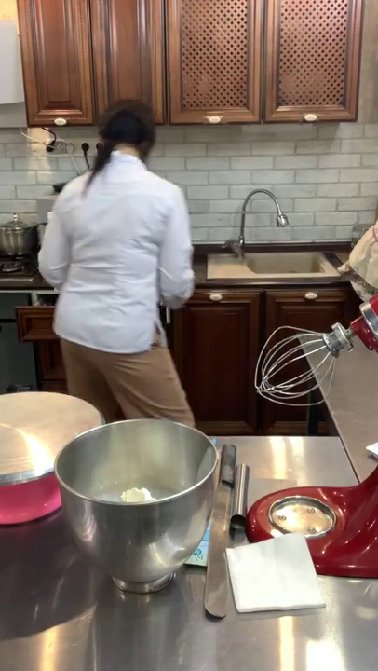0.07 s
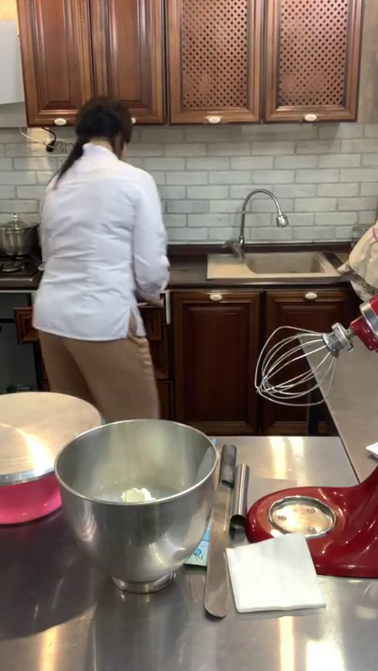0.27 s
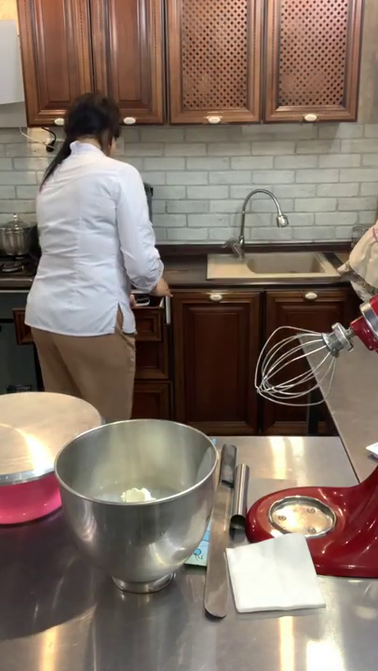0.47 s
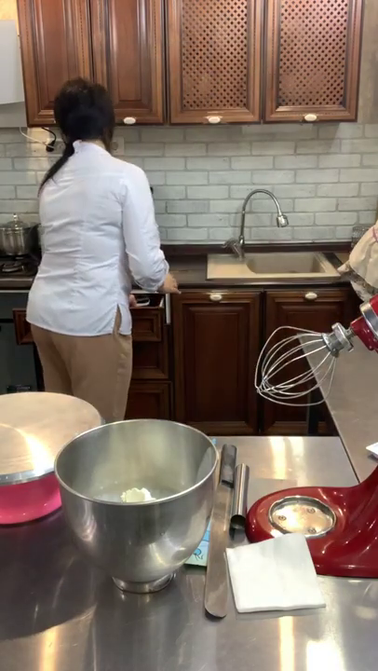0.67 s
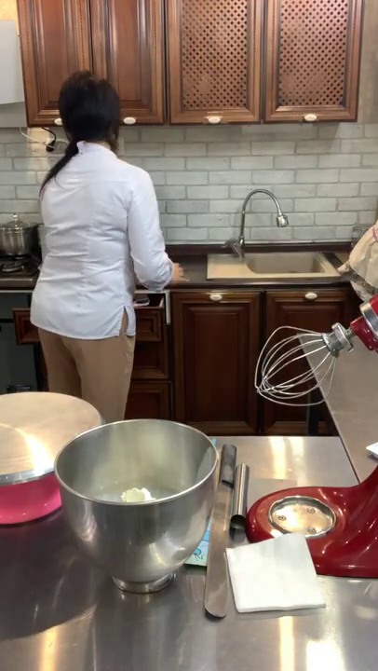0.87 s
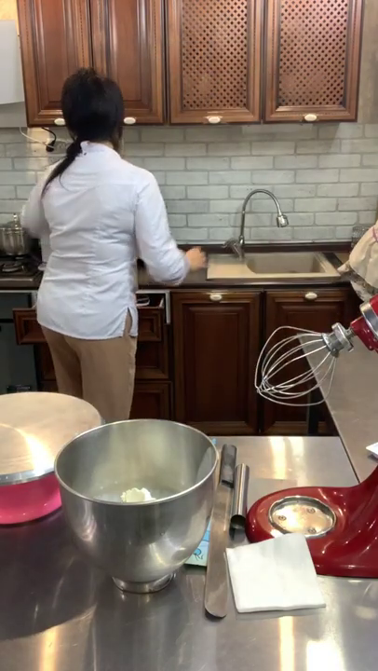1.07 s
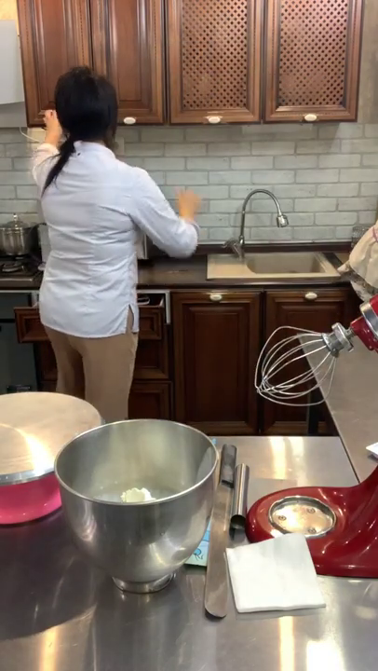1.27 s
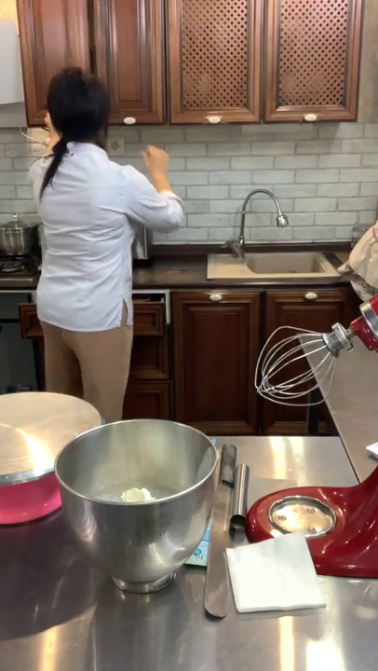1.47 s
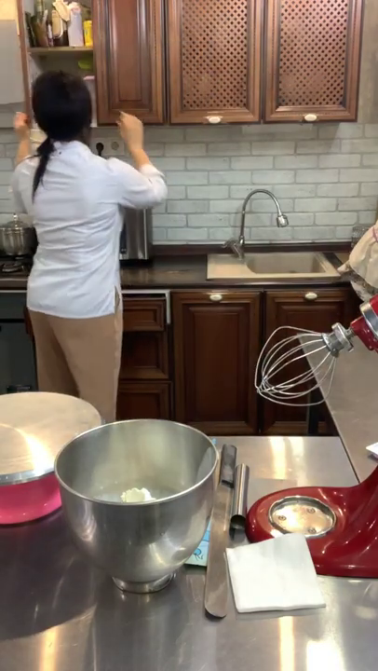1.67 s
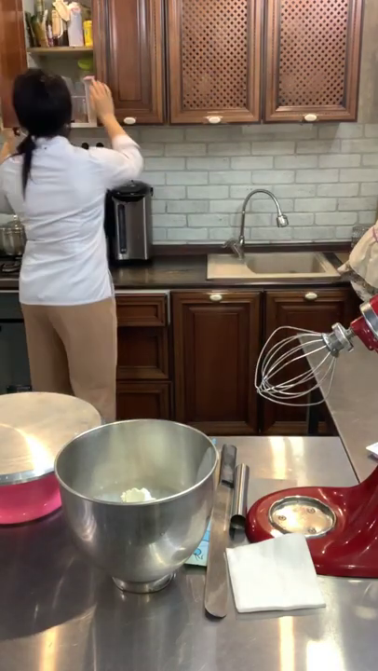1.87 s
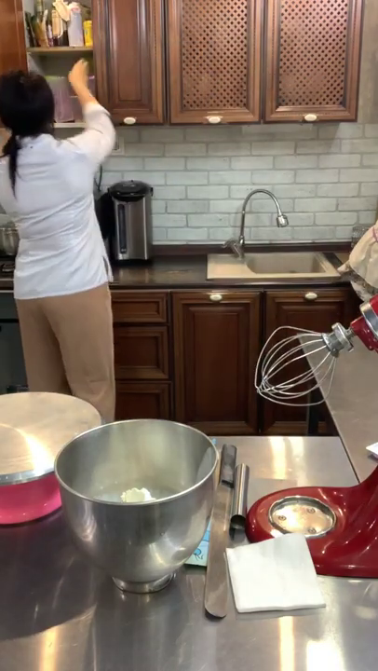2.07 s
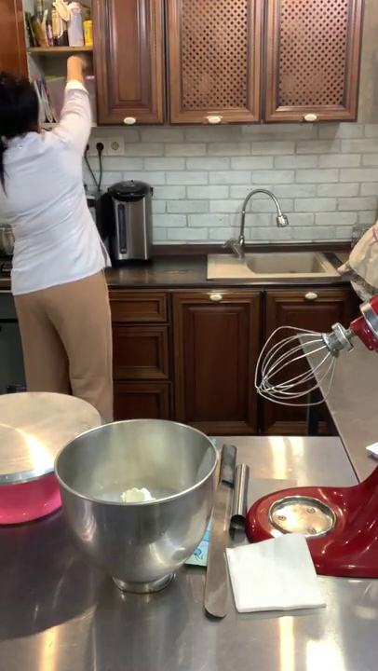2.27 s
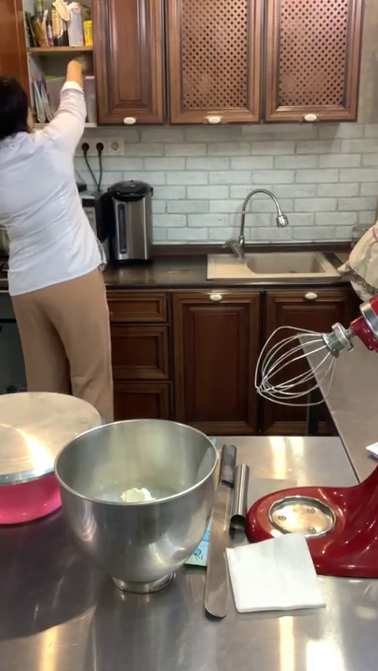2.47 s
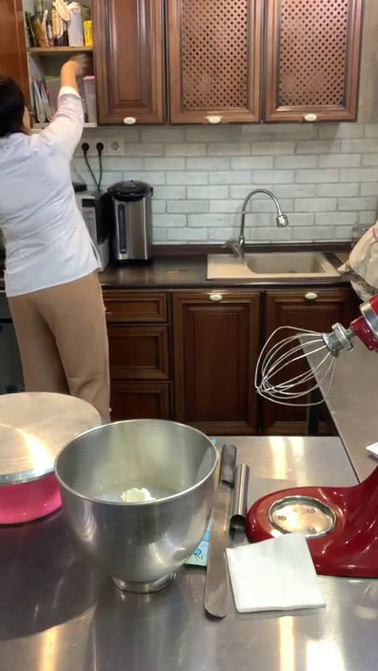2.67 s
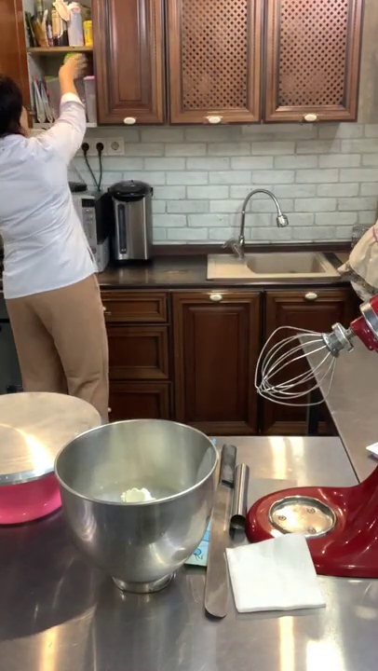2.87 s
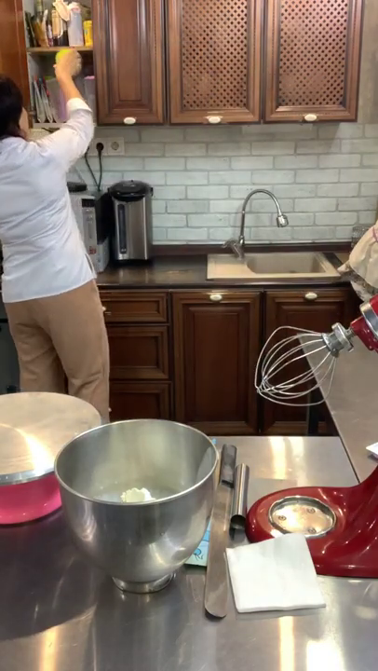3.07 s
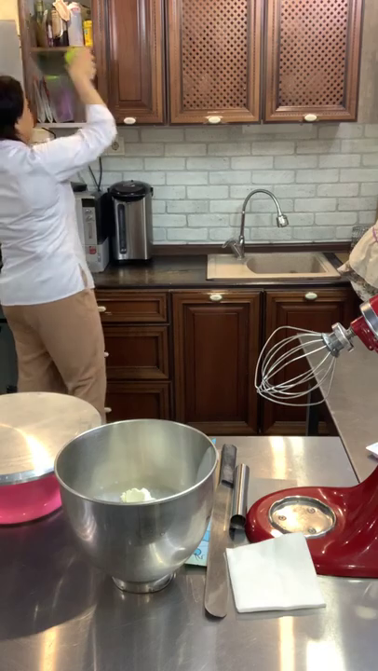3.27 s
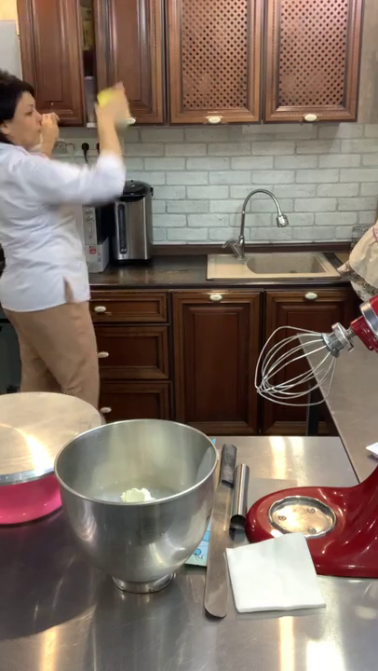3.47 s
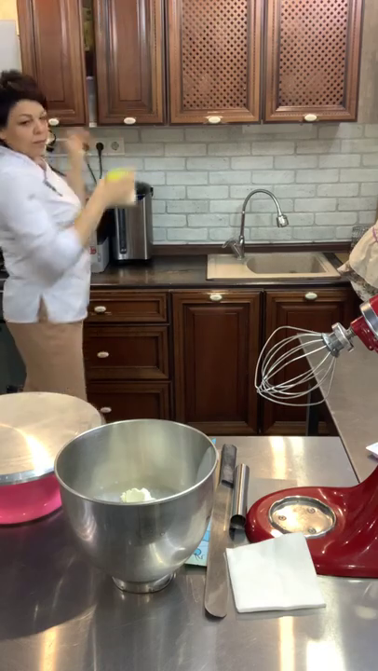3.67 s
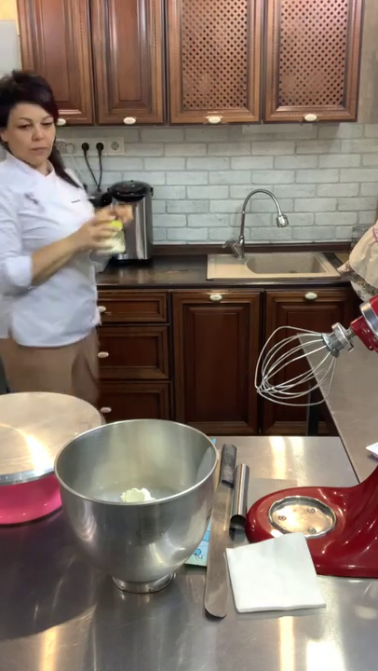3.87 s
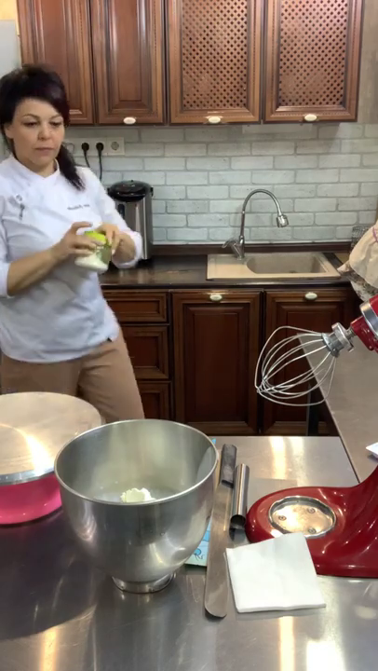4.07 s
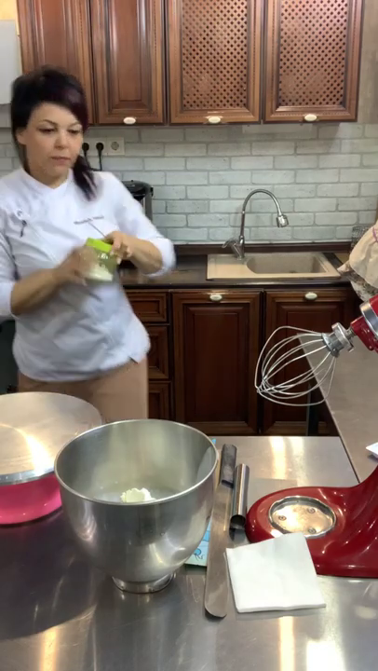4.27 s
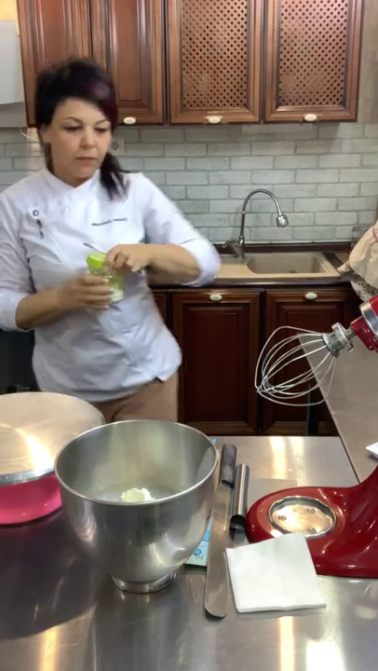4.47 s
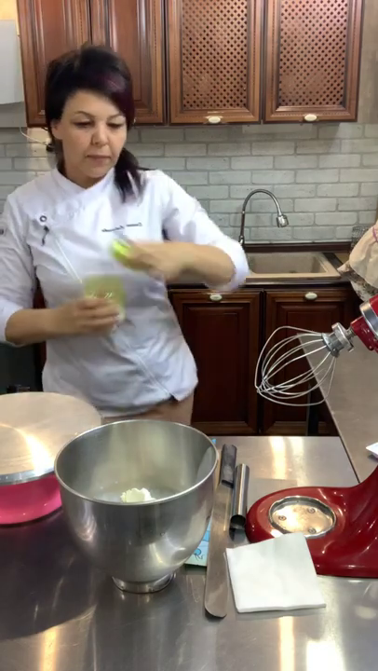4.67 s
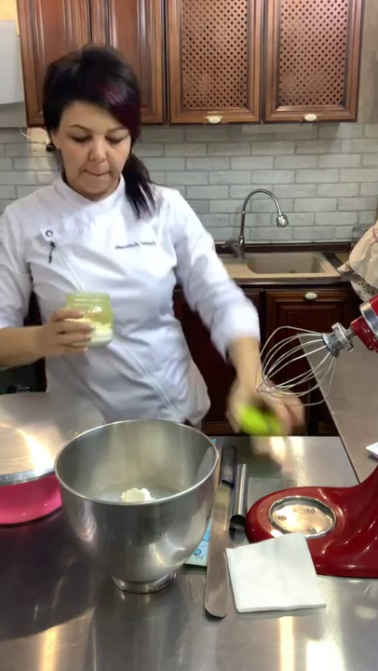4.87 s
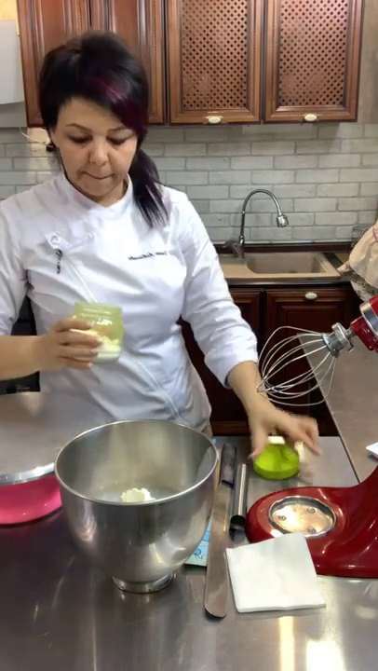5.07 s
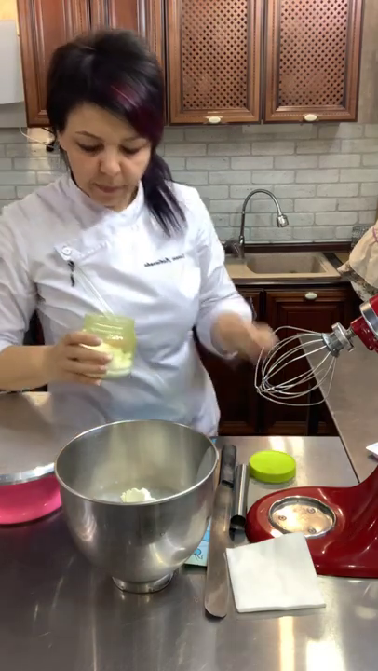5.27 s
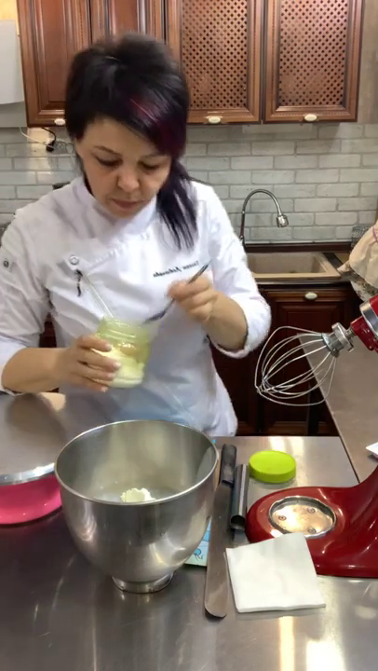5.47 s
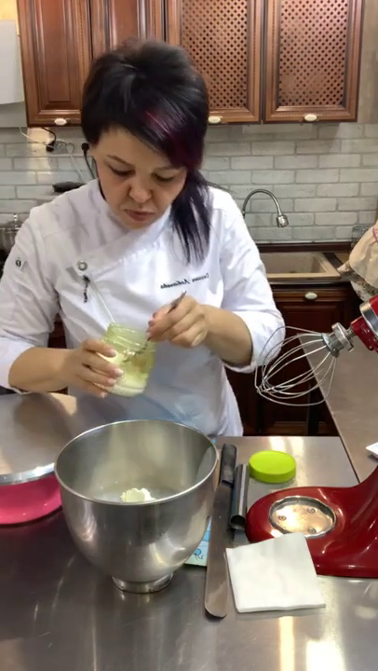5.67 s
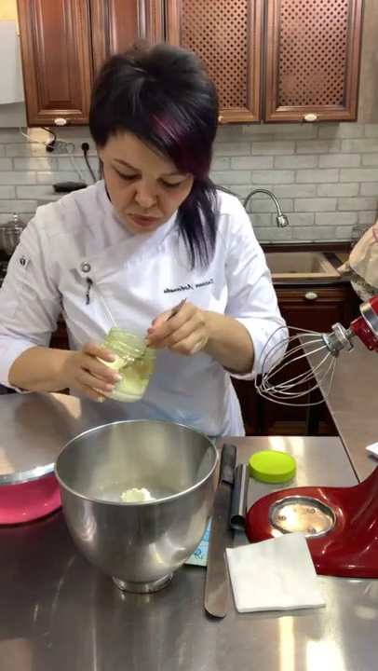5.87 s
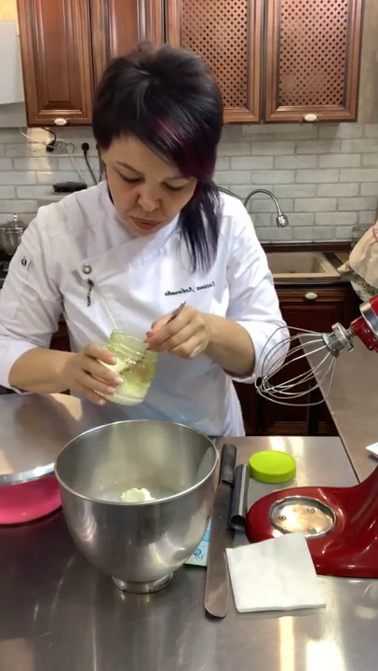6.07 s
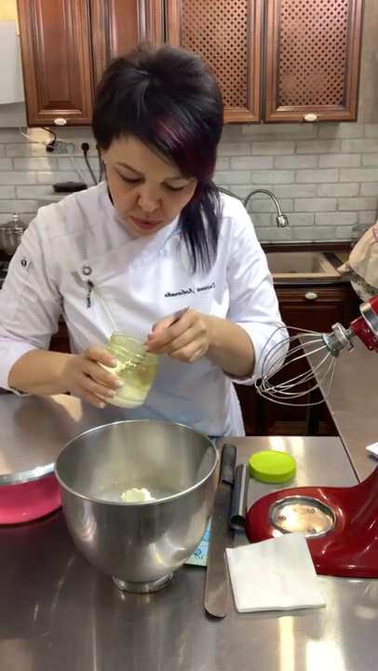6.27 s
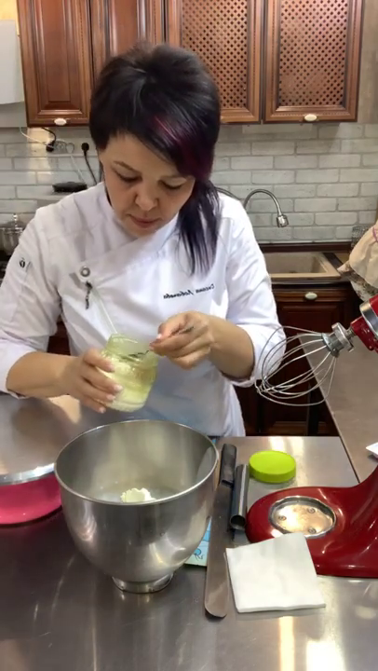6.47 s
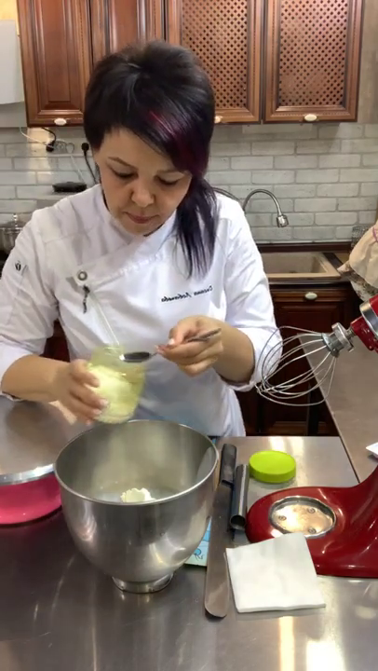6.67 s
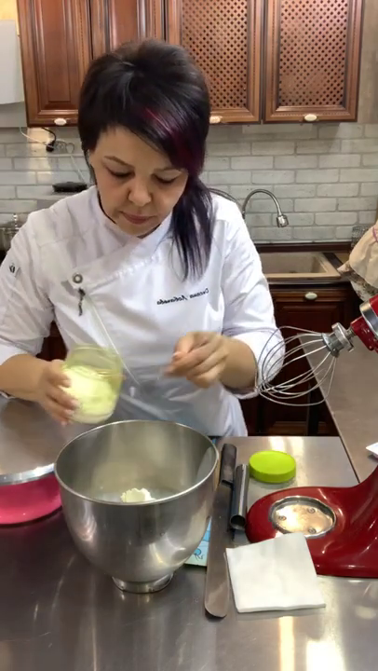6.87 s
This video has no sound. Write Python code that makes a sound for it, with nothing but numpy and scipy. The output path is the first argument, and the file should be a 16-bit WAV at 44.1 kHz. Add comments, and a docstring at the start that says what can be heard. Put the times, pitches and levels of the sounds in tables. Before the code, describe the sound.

Indoor kitchen with a quiet fridge and fan hum, microphone on the worktop. At the far wall come light wooden knocks, gritty drawer scrapes and clinking cutlery, then a heavy drawer thump. After a faint jar scrape, a cupboard door bangs in a tight cluster of cracks with low boom and short room tail. Nearer, soft hand rubbing, a sharp click, hollow plastic taps settling in pairs, and a tiny metallic ping.

```python
"""Kitchen drawer, cupboard and jar lid

A fridge hums in a tiled kitchen. A cutlery drawer is pulled in short strokes and bumped shut; a jar is taken
from a wall cupboard, whose wooden door slams. Close by, its plastic lid is unscrewed and dropped on a steel
worktop, and a spoon pings. Struck parts are damped sines and filtered noise bursts, friction is gritty
filtered noise, the fridge and fan are shaped noise with steady tones; synthetic room tails set the distance.
"""
import sys
import numpy as np
from scipy import signal
from scipy.fft import rfft, irfft, next_fast_len
from scipy.io import wavfile
from scipy.ndimage import uniform_filter1d

SR = 44100
rng = np.random.default_rng(int(sys.argv[2]) if len(sys.argv) > 2 else 0)


def wrap_up_sound(samples):
    """Save the sound to the file named by the first command line argument, as 16-bit audio."""
    columns = np.atleast_2d(samples).T
    # keep every value between -1 and 1, then stretch to whole-number steps
    tamed = np.clip(columns, -1, 1)
    steps = np.round(tamed * 32767).astype(np.int16)
    wavfile.write(sys.argv[1], SR, steps)


N = 305260  # length of the scene in samples
T = np.arange(SR) / SR  # one second of time, the longest any single sound lasts before the room
EDGE_HZ = 16000  # upper band limit

# Colour tables give relative shape only. Event levels are set before any room.
# Air noise colour: (frequency [Hz], level [dB])
AIR_COLOUR = [(15, -29), (24, -29), (32, -0.5), (60, 2), (95, -3), (115, -4), (300, -11.5), (500, -15.5),
              (900, -19.5), (1900, -27.5), (2900, -25), (4500, -33), (8500, -36), (11500, -51.5),
              (15500, -44)]
AIR_DB = -53.5  # rms
# Broad hums and whine of a fan: (frequency [Hz], level [dB], width [Hz])
FAN_HUMS = [(59.7, -63, 11), (320.5, -66.5, 18), (2995, -73.5, 20)]
COMPRESSOR_HZ = 49.27
# Strong orders of the fridge compressor: (multiple of its pitch [count], level [dB])
COMPRESSOR_ORDERS = [(2, -67.5), (3, -67.5), (4, -65), (11, -72), (12, -69.5), (13, -72), (14, -83),
                     (21, -80), (45, -80.5), (57, -73.5), (58, -78), (60, -77), (61, -72), (80, -80),
                     (81, -83)]
# Light knocks and clicks of drawer, doors and shelf:
# (time [s], level [dB], centre [Hz], width [octaves])
KNOCKS = [(0.0, -46.5, 480, 0.99), (.368, -45, 1550, 0.71), (.458, -39, 720, 1.86), (.497, -47.5, 330, 0.8),
          (.63, -40.5, 870, 0.91), (1.29, -49, 1090, 1.37), (1.365, -51, 570, 1.4),
          (1.549, -44.5, 330, 0.92), (1.582, -45, 288, 1.8), (1.937, -59.5, 2480, 1.15),
          (2.557, -47.5, 1610, 0.72), (3.012, -58.5, 400, 1.4), (3.567, -57.5, 7100, 1.4),
          (4.099, -50, 8100, 0.28), (4.381, -55, 2450, .3), (4.445, -48.5, 374, 0.52)]
# Rattle at 1 kHz; smaller parts settle sooner, by this power of their pitch
KNOCK_T60_S, KNOCK_SHORTENING = 0.069, 0.34
# Pushes on drawer and door: (start [s], length [s], level [dB])
PUSHES = [(0.0, 0.077, -47.5), (1.298, .29, -42), (1.765, 0.12, -41), (1.985, .13, -46)]
# Carcass rumble colour: (frequency [Hz], level [dB])
CARCASS_COLOUR = [(40, -25), (65, -6), (82, 0), (105, -3), (135, -13), (220, -14), (400, -32), (2000, -90)]
# Colour of the rollers' murmur under a push: (frequency [Hz], level [dB])
ROLLERS_COLOUR = [(100, -25), (240, 3.5), (420, -3.5), (700, -7.5), (1500, -18.5), (2600, -20.5),
                  (9000, -29.5), (12000, -53)]
ROLLERS_DB = -9  # relative to the rumble
# Pulls that scrape the drawer along its runners: (start [s], length [s], level [dB])
DRAWER_PULLS = [(.115, 0.36, -52.5), (.448, 0.11, -41.5), (.685, 0.072, -39)]
# Runner scrape colour: (frequency [Hz], level [dB])
RUNNERS_COLOUR = [(150, -27), (250, 4), (400, -3), (860, -0.5), (1500, -6), (2320, -4.5), (4000, -8.5),
                  (5300, -7), (9000, -9), (11500, -26), (16000, -24)]
# Runner squeaks, level of the fundamental: (start [s], length [s], level [dB])
SQUEAKS = [(0.275, 0.023, -51), (0.361, .025, -50)]
# Pitch at the first squeak; it climbs as the drawer gathers speed
SQUEAK_HZ, SQUEAK_RISE_HZ_PER_S = 1147, 1480
# Cutlery jostling in the drawer:
# (time [s], level [dB], pitch scale of the modes [factor], ring relative to jangle [dB])
CLINKS = [(.461, -44.5, 0.83, -8), (.556, -46.5, 0.63, -14), (0.69, -46.5, 1.3, -19),
          (1.577, -44, 0.99, 12)]
# Ringing modes of the cutlery: (frequency [Hz], level [dB], T60 [s])
CUTLERY_MODES = [(1550, -9, 0.28), (3140, 2.5, 0.067), (3480, 3, 0.04), (4570, -3, 0.11), (4700, 2, 0.085),
                 (5230, 3, 0.058), (6100, -4, 0.077), (6470, -2, 0.059), (7960, -2, 0.098), (8280, 1, 0.08),
                 (9470, -17, .15), (14400, -19, 0.12)]
# Colour of metal jangling: (frequency [Hz], level [dB])
JANGLE_COLOUR = [(1500, -14), (3000, -2), (5200, 5), (9000, 0.5), (11500, -16.5), (15500, -15)]
# One fork tine is plucked: (time [s], level [dB])
TINE_PING = (.691, -50)
# Ringing modes of the tine: (frequency [Hz], level [dB], T60 [s])
TINE_MODES = [(5300, -2, .15), (8930, -5, .15), (10320, -9, .25), (14450, -15, .3), (14930, 0, .07),
              (15120, -1, .06)]
# Blows of the drawer on its stop:
# (time [s], crack level [dB], brightness [dB/octave], nominal rattle T60 [s], boom level [dB])
DRAWER_BLOWS = [(2.104, -51.5, 3, 0.15, -42), (2.133, -30, -1, 0.095, -40), (2.143, -21.5, 1, 0.064, -19.5),
                (2.176, -33, 0.5, 0.15, -24), (2.222, -34, 2, 0.078, -28.5)]
# Colour of the drawer's wooden crack: (frequency [Hz], level [dB])
DRAWER_WOOD = [(50, -23), (105, -4.5), (140, -4.5), (175, -12), (320, -15), (470, -14), (700, -16),
               (800, -19), (1300, -19.5), (1800, -23), (2840, -28), (8000, -39), (11000, -51.5),
               (16000, -66)]
# Booming modes of drawer and cabinet: (frequency [Hz], level [dB], T60 [s])
DRAWER_MODES = [(69.1, -1.5, 0.91), (79.5, -3, 0.8), (127.4, 3, 0.41), (137.8, -1.5, 0.9),
                (356, -10.5, 0.38), (426, -2, 0.14), (477, 2.5, 0.12), (559, -4, 0.27), (711, -5, 0.3),
                (917, -16, .25), (1045, -24, .3), (1343, -12, 0.27)]
# The jar is dragged over the shelf: (start [s], length [s], level [dB])
JAR_DRAGS = [(2.705, .125, -53), (2.86, 0.15, -58.5)]
# Jar scrape colour: (frequency [Hz], level [dB])
JAR_COLOUR = [(600, -8), (1300, 2.5), (2500, -1), (3600, -11.5), (9000, -31), (14000, -49)]
# Colour of the shelf board droning under the jar: (frequency [Hz], level [dB])
SHELF_COLOUR = [(90, -23), (170, -1), (240, -2), (400, -13), (900, -32), (3000, -70)]
SHELF_DB = 1.5  # relative to the scrape
# Blows of the cupboard door on its frame:
# (time [s], crack level [dB], brightness [dB/octave], nominal rattle T60 [s], boom level [dB])
DOOR_BLOWS = [(3.915, -38, 5, .03, -43), (3.9185, -20, -1.5, 0.062, -16), (3.931, -20, 0.9, 0.047, -42),
              (3.958, -29.5, 0.5, 0.12, -40), (4.044, -27.5, -1.5, 0.072, -25),
              (4.098, -39, 2.5, 0.069, -31)]
# Colour of the door's wooden crack: (frequency [Hz], level [dB])
DOOR_WOOD = [(40, -27.5), (70, -10.5), (145, -5), (178, -16), (256, -7), (350, -19), (480, -19),
             (800, -16.5), (1050, -16.5), (1440, -20.5), (2000, -22.5), (3200, -24), (8300, -38.5),
             (11000, -57), (16000, -67)]
# Booming modes of door and cupboard: (frequency [Hz], level [dB], T60 [s])
DOOR_MODES = [(40.5, -12, 1), (65.1, 2, 1), (72, -7, 0.82), (88.4, -3, 0.98), (101, -12, .6),
              (117.5, -3, 0.6), (142.4, -0.5, 0.92), (205.4, -10.5, 0.71), (237.7, -7, 0.47),
              (263, -8, 0.64), (332, -4, 0.27), (364, -2, 0.1), (457.8, 0.5, 0.22), (547, 3, 0.075),
              (603, -11, 0.8), (763, -14, 0.54), (1032, -9, 0.21), (1386, -1.5, 0.067)]
# Hands and sleeve rub as the lid is twisted, lifted off and carried: (start [s], length [s], level [dB])
HAND_RUBS = [(4.22, 0.19, -54.5), (4.425, 0.22, -53.5), (4.716, 0.036, -42), (4.79, .09, -46.5)]
# Hand and sleeve colour: (frequency [Hz], level [dB])
SLEEVE_COLOUR = [(240, -23), (450, -4), (700, -2), (1100, -12), (3000, -15), (6000, -17), (8500, -14.5),
                 (11500, -34), (16000, -33)]
# The lid clicks against a utensil: (time [s], clack level [dB], ring level [dB])
LID_CLICK = (4.853, -36.5, -42)
# Colour of the clack: (frequency [Hz], level [dB])
CLACK_COLOUR = [(400, -21), (750, -3), (1000, -16.5), (1600, -20), (1950, -2), (3600, -4), (4300, -16),
                (5600, -3), (7000, -17.5), (9000, -21), (12000, -52)]
# Ringing modes of the click: (frequency [Hz], level [dB], T60 [s])
CLICK_MODES = [(722, -1, 0.056), (824, -8, 0.051), (2196, -2, 0.044), (2670, -14, .04), (3540, -1, 0.064),
               (3770, -5, .05)]
# The plastic lid on the worktop:
# (time [s], tap level [dB], brightness [dB/octave], hollow ring level [dB], chatter relative to contact [dB])
LID_TAPS = [(4.9665, -30.5, 2, -45, 2), (4.971, -36, -1, -50, 5), (5.0053, -31, 2, -43, 7.5),
            (5.009, -35.5, -1, -33.5, 5), (5.039, -44, -1, -63, -2), (5.071, -40.5, -0.5, -58, 4),
            (5.1908, -38.5, 3.5, -49, 1), (5.196, -47.5, -4, -43.5, 10), (5.241, -42, -1.5, -50, 12),
            (5.247, -59, -4.5, -41, 12)]
# Lid tap colour: (frequency [Hz], level [dB])
LID_COLOUR = [(250, -26), (500, -14), (620, -11.5), (730, -3.5), (950, -20), (1340, -6.5), (1800, -10),
              (2300, -12), (2700, -9), (3490, -15.5), (4340, -13), (5300, -20), (8500, -19.5),
              (11100, -40.5), (16000, -43)]
# Hollow modes of the lid: (frequency [Hz], level [dB], T60 [s])
LID_MODES = [(738, 4, 0.047), (1124, 0.5, 0.027), (1337, -6.5, .08), (1600, -13, 0.19), (2755, -4, 0.056),
             (4170, -11.5, 0.091), (4460, -26, 0.17)]
# The spoon pings: (time [s], ring level [dB], tick level [dB])
SPOON_PING = (5.3995, -59.5, -57)
# Ringing modes of the spoon: (frequency [Hz], level [dB], T60 [s])
SPOON_MODES = [(4790, -5, .14), (4920, -1, .08), (7870, -7, .1), (9140, 0, .11), (12500, -17, .2),
               (14200, -17, .18)]
# Reverberation of the kitchen: (frequency [Hz], T60 [s])
ROOM_T60 = [(60, 1), (250, 0.78), (1000, 0.56), (3000, 0.6), (8000, 0.52), (15000, 0.4)]


def amp(db):
    """Decibels to gain."""
    return 10 ** (np.asarray(db) / 20)


def evened(x):
    """Scales to rms 1."""
    return x / np.sqrt(np.mean(x ** 2) + 1e-20)


def sized(x, db):
    """Gives a hit the energy of a tenth of a second at this level."""
    return amp(db) * x * np.sqrt(SR / 10) / np.linalg.norm(x)


def read(points, hz):
    """Joins points by straight lines over log frequency."""
    f, value = np.transpose(points)
    return np.interp(np.log(hz + 1), np.log(f + 1), value)


def add(mix, s, sound):
    """Mixes a sound in at time s."""
    part = mix[max(0, round(s * SR)):][:len(sound)]
    part += sound[:len(part)]


def coloured(x, spectrum, tilt_db=0, size=4096):
    """Causal minimum-phase filter with the given spectrum, tilted in dB per octave about 1 kHz."""
    hz = abs(np.fft.fftfreq(size, 1 / SR))
    octaves = np.log2(np.maximum(hz, 100) / 1000)  # the tilt levels off below 100 Hz
    gain_db = np.maximum(read(spectrum, hz) + tilt_db * octaves, -100)
    log_gain = np.log(amp(gain_db))
    taps = np.fft.ifft(np.exp(np.conj(signal.hilbert(log_gain)))).real
    return signal.oaconvolve(x, taps[:size // 2])[:len(x)]


def dying(t60):
    """An exponential decay, 60 dB down after t60 seconds."""
    return np.exp(-np.log(1000) * T / np.maximum(t60, 1e-3))


def ring(modes, scale=1):
    """Damped sines of a struck body, in alternating polarity."""
    out = np.zeros(len(T))
    for k, (hz, db, t60) in enumerate(modes):
        t = T[T < 2 * t60]
        decay = np.exp(-np.log(1000) * t / t60)
        add(out, 0, (-1) ** k * amp(db) * decay * np.sin(2 * np.pi * hz * scale * t))
    return out


def contact(t60, chatter_db):
    """One sharp contact, then a dying chatter of loose parts, flattened in spectrum."""
    force = rng.standard_normal(len(T)) * dying(t60)
    force *= amp(chatter_db) / np.linalg.norm(force)
    force[0] += 1
    phase = np.angle(rfft(force))
    flattened = irfft(np.exp(1j * phase), len(T))
    return flattened * dying(4 * t60)  # reins in the spread left by flattening


def stroke(length, attack_s, release_s):
    """The speed of one movement: it builds up, holds and dies away."""
    return np.minimum(T / attack_s, 1) * np.exp(-np.maximum(T - length, 0) / release_s)


def rub(strokes, colour, attack_s, release_s, grain_db=0, bump_db=0):
    """Friction: a dense stream of tiny slips, uneven on a fine (grain) and a coarser (bump) scale."""
    out = np.zeros(N)
    for s, length, db in strokes:
        slips, grains, bumps = rng.standard_normal((3, len(T)))
        uneven_db = grain_db * evened(uniform_filter1d(grains, size=120))
        uneven_db += bump_db * evened(uniform_filter1d(bumps, size=900))
        friction = evened(coloured(slips * amp(uneven_db), colour))
        add(out, s, amp(db) * stroke(length, attack_s, release_s) * friction)
    return out


def room(x, direct_db, build_s):
    """Direct sound plus dense reflections from the tiles, each band dying at its own speed."""
    hz, t, z = signal.stft(rng.standard_normal(len(T)), SR, nperseg=256)
    z = z * np.exp(-np.log(1000) * t / read(ROOM_T60, hz)[:, None])
    tail = signal.istft(z, SR, nperseg=256)[1][:len(T)] * (1 - np.exp(-T / build_s))
    spectrum = rfft(tail)
    spectrum /= np.sqrt(uniform_filter1d(abs(spectrum) ** 2, size=90))  # a diffuse field favours no band
    response = irfft(spectrum, len(T)) * np.minimum(2 * (1 - T), 1) ** 2  # fades to silence at its end
    response[0] += amp(direct_db)
    return signal.fftconvolve(x, response / np.linalg.norm(response))[:N]


def appliance(faint_db=-4, scatter_db=4):
    """Air noise, a fan's hum and the fridge compressor's buzz of many faint orders and a few strong ones."""
    size = next_fast_len(N, True)
    bins = np.fft.rfftfreq(size, 1 / SR)
    air = amp(AIR_DB) * evened(amp(read(AIR_COLOUR, bins)))
    fan = sum(amp(db) * evened(1 / (1 + (2 * (bins - hz) / width) ** 4)) for hz, db, width in FAN_HUMS)
    hiss = irfft((air + fan) * rfft(rng.standard_normal(size)), size)
    multiples = np.arange(2, 190)
    at = np.round(multiples * COMPRESSOR_HZ * size / SR).astype(int)
    # the faint orders follow the colour of the air noise, each with a height of its own
    scatter = amp(faint_db + scatter_db * rng.standard_normal(len(at)))
    heights = air[at] * np.sqrt(2 * COMPRESSOR_HZ / SR) * scatter
    for multiple, db in COMPRESSOR_ORDERS:
        heights[multiples == round(multiple)] = amp(db)
    lines = np.zeros(len(bins), complex)
    lines[at] = heights * np.exp(2j * np.pi * rng.random(len(at)))
    buzz = irfft(lines, size) * size / np.sqrt(2)  # each height becomes the rms of its tone
    return (hiss + buzz)[:N]


def knocks():
    """Light wooden contacts: the higher a part is pitched, the shorter it rattles."""
    out, hz = np.zeros(N), np.geomspace(30, EDGE_HZ, num=40)
    for s, db, centre_hz, width in KNOCKS:
        t60 = KNOCK_T60_S * (1000 / centre_hz) ** KNOCK_SHORTENING
        hump_db = -20 * np.log10(1 + (np.log2(hz / centre_hz) / width) ** 2)
        dull_db = read([(8800, 3.5), (11500, -13.0)], hz)  # shelves the top down
        knock = coloured(contact(t60, 3.1), np.c_[hz, hump_db + dull_db])
        add(out, s, sized(knock, db))
    return out


def carcass():
    """Pushes on drawer and door make the cabinet carcass rumble: low filtered noise."""
    return rub(PUSHES, CARCASS_COLOUR, attack_s=0.022, release_s=0.033)


def squeak(waver=0.024, overtone=.9):
    """The runner sticks and slips at an unsteady, rising rate: a tone and its octave."""
    out = np.zeros(N)
    for s, length, db in SQUEAKS:
        hz = SQUEAK_HZ + SQUEAK_RISE_HZ_PER_S * (s - SQUEAKS[0][0] + T)
        unsteady = 1 + waver * evened(uniform_filter1d(rng.standard_normal(len(T)), size=150))
        phase = 2 * np.pi * np.cumsum(hz * unsteady) / SR
        tone = np.sin(phase) + overtone * np.sin(2 * phase)
        add(out, s, amp(db) * stroke(length, attack_s=0.012, release_s=.015) * tone)
    return out


def runners():
    """The drawer scrapes and squeaks when pulled; rollers murmur under the pushes."""
    scrape = rub(DRAWER_PULLS, RUNNERS_COLOUR, attack_s=0.0098, release_s=0.017, grain_db=6.0, bump_db=0.3)
    murmur = rub(PUSHES, ROLLERS_COLOUR, attack_s=0.021, release_s=.03, grain_db=3, bump_db=1.8)
    return scrape + squeak() + amp(ROLLERS_DB) * murmur


def cutlery(spread=0.0195):
    """Three spoons of nearly equal size jangle and ring in each clink; one fork tine pings."""
    out = np.zeros(N)
    for s, db, scale, ring_db in CLINKS:
        ringing = np.zeros(len(T))
        for k in (-1, 0, 1):
            spoon = sized(ring(CUTLERY_MODES, scale * (1 + k * spread)), -4 * abs(k))
            ringing += signal.fftconvolve(contact(0.016, 0), spoon)[:len(T)]
        jangle = coloured(contact(0.065, 12), JANGLE_COLOUR)
        add(out, s, sized(sized(jangle, 0) + sized(ringing, ring_db), db))
    s, db = TINE_PING
    add(out, s, sized(ring(TINE_MODES), db))
    return out


def slam(blows, wood, modes, swell_s, chatter_db, direct_db):
    """Each blow cracks and rattles the wood in the room and sets panels and cabinet booming."""
    crack, boom = np.zeros((2, N))
    panels = ring(modes) * (1 - np.exp(-T / swell_s))  # heavy panels take a moment to get moving
    for s, db, tilt_db, t60, boom_db in blows:
        add(crack, s, sized(coloured(contact(t60, chatter_db), wood, tilt_db), db))
        add(boom, s, sized(panels, boom_db))
    return room(crack, direct_db, build_s=0.0013) + boom


def drawer_slam():
    """The drawer bumps its stop in a cluster of wooden blows."""
    return slam(DRAWER_BLOWS, DRAWER_WOOD, DRAWER_MODES, swell_s=0.0028, chatter_db=7.5, direct_db=-6)


def jar():
    """The jar's base scrapes over the shelf, which drones along."""
    scrape = rub(JAR_DRAGS, JAR_COLOUR, attack_s=0.023, release_s=.02, grain_db=2.5, bump_db=2.5)
    drone = rub(JAR_DRAGS, SHELF_COLOUR, attack_s=0.019, release_s=.03)
    return scrape + amp(SHELF_DB) * drone


def door_slam():
    """The cupboard door strikes its frame in a cluster of wooden blows."""
    return slam(DOOR_BLOWS, DOOR_WOOD, DOOR_MODES, swell_s=0.00091, chatter_db=10.0, direct_db=-5.0)


def hands():
    """Hands and sleeve rub around the lid: soft, slightly grainy friction."""
    return rub(HAND_RUBS, SLEEVE_COLOUR, attack_s=0.0077, release_s=0.033, grain_db=1.5, bump_db=1.5)


def worktop():
    """The lid clicks, drops and rocks to rest, its hollow ringing; then the spoon is lifted and pings."""
    out = np.zeros(N)
    s, clack_db, ring_db = LID_CLICK
    clack = coloured(contact(0.069, 12), CLACK_COLOUR)
    add(out, s, sized(clack, clack_db) + sized(ring(CLICK_MODES), ring_db))
    for s, db, tilt_db, ring_db, chatter_db in LID_TAPS:
        tap = coloured(contact(0.031, chatter_db), LID_COLOUR, tilt_db)
        add(out, s, sized(tap, db) + sized(ring(LID_MODES), ring_db))
    s, ring_db, tick_db = SPOON_PING
    tick = coloured(contact(0.022, 2.5), JANGLE_COLOUR, tilt_db=1.2)
    add(out, s, sized(ring(SPOON_MODES), ring_db) + sized(tick, tick_db))
    return out


def scene():
    """Cabinets at the far wall, heard mostly through the room; worktop close by; booms and hum kept dry."""
    far = room(knocks() + runners() + cutlery() + jar(), direct_db=-12, build_s=.002)
    near = room(hands() + worktop(), direct_db=2.5, build_s=0.0052)
    return (appliance() + carcass() + drawer_slam() + door_slam() + far + near)[None]


def record(dry):
    """The band limit: a steep low-pass."""
    lowpass = signal.firwin(511, EDGE_HZ, window=("kaiser", 9), fs=SR)
    return signal.oaconvolve(dry, lowpass[None], "same")


dry = scene()
out = record(dry)
wrap_up_sound(out)
```